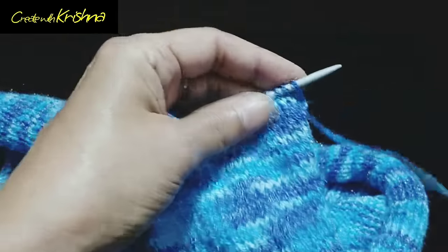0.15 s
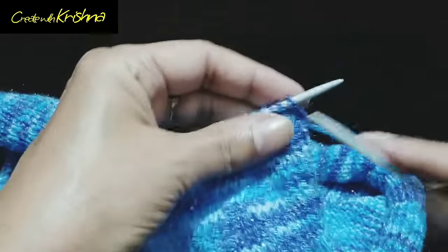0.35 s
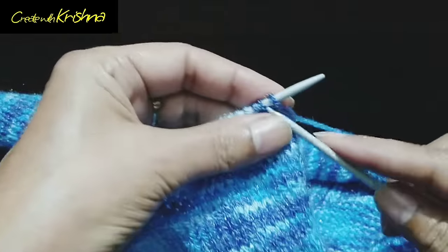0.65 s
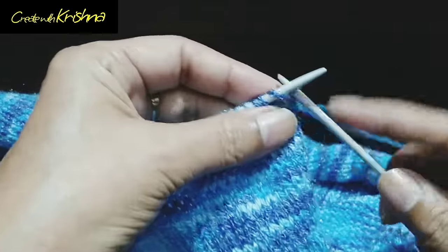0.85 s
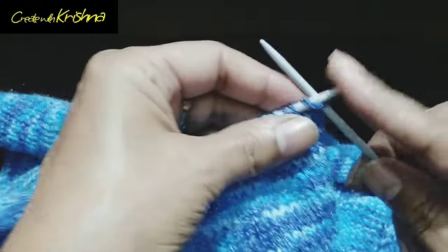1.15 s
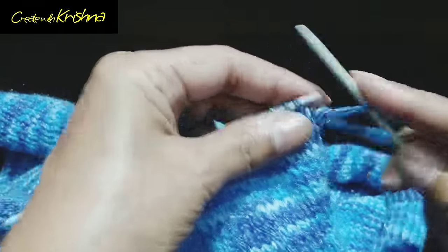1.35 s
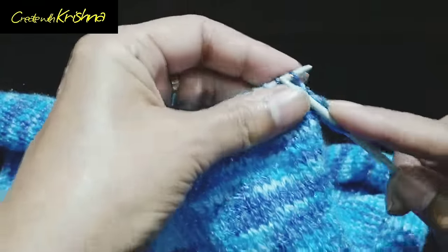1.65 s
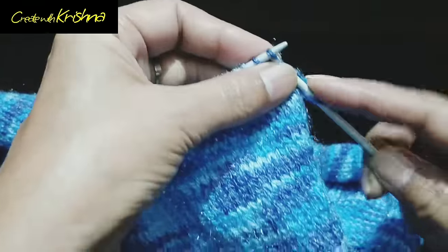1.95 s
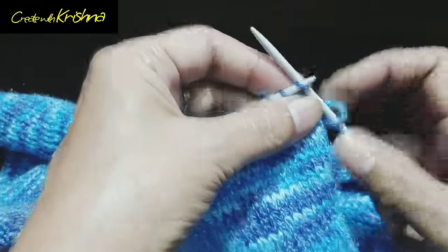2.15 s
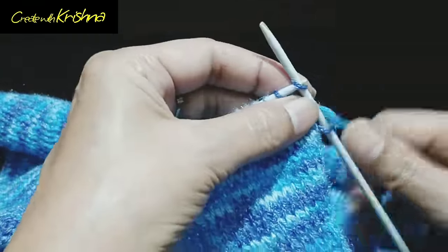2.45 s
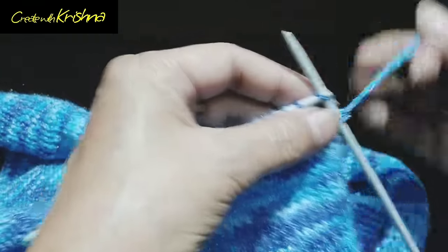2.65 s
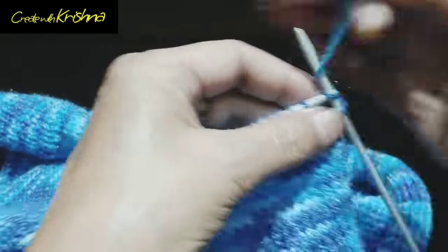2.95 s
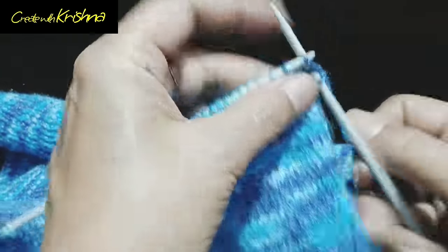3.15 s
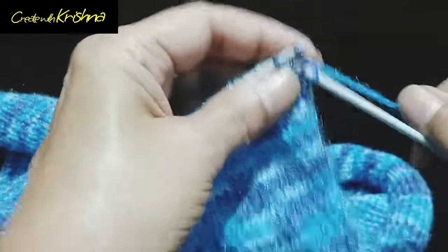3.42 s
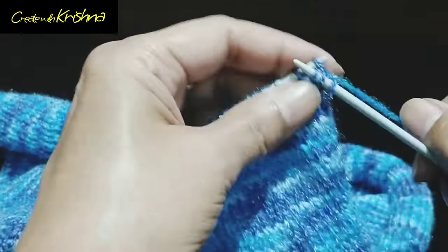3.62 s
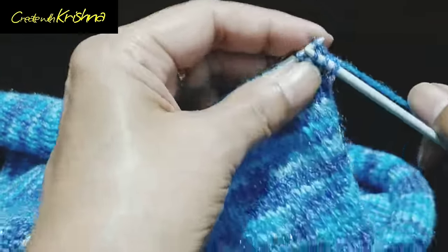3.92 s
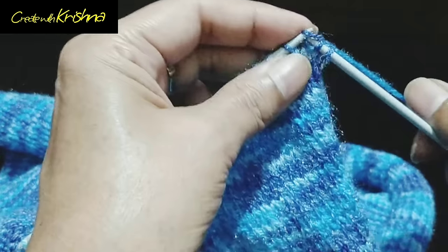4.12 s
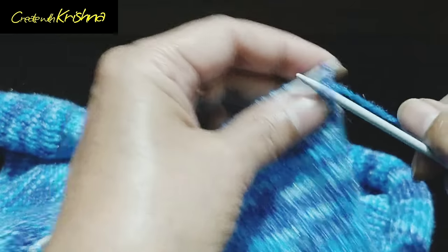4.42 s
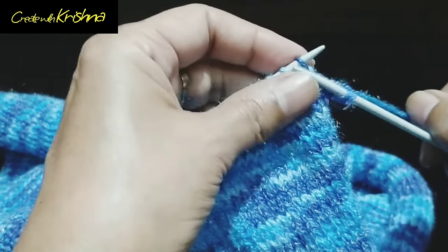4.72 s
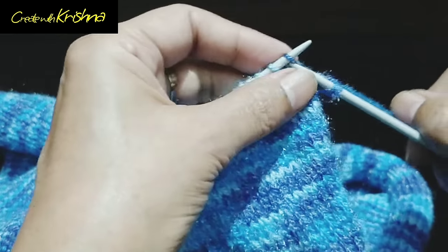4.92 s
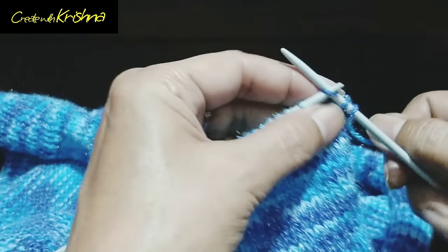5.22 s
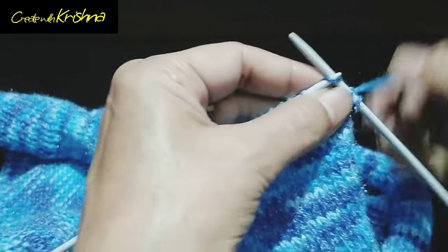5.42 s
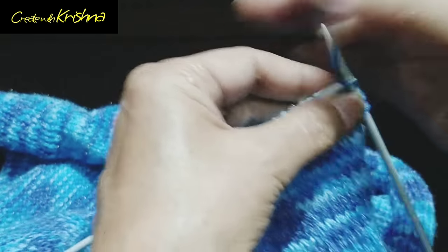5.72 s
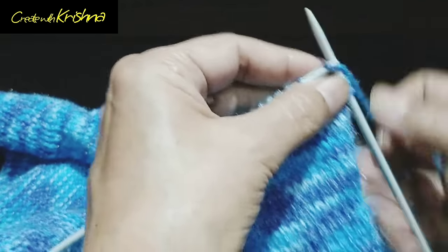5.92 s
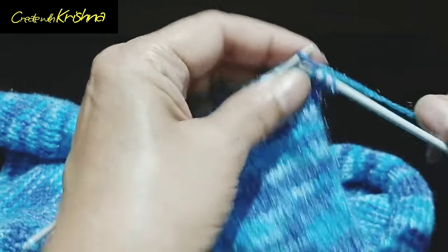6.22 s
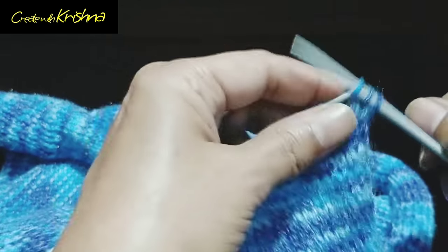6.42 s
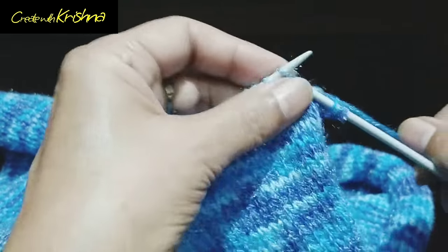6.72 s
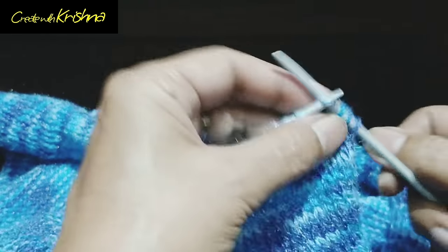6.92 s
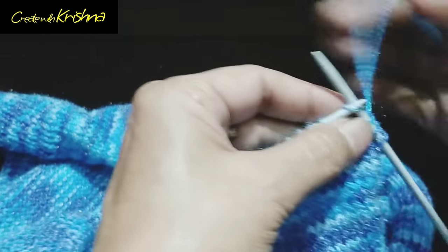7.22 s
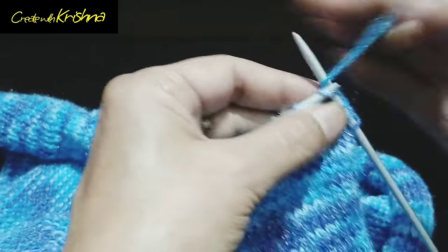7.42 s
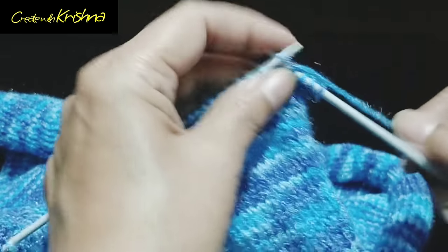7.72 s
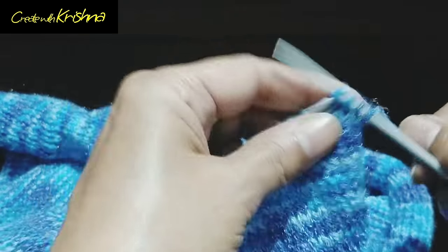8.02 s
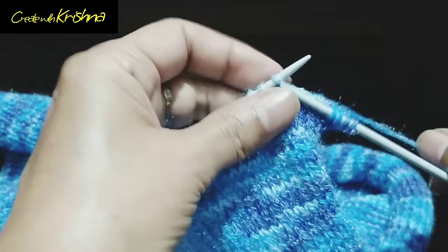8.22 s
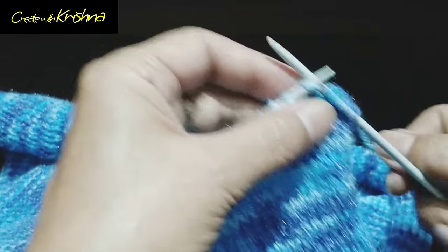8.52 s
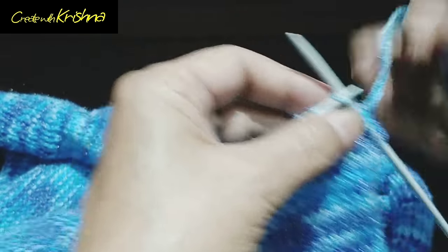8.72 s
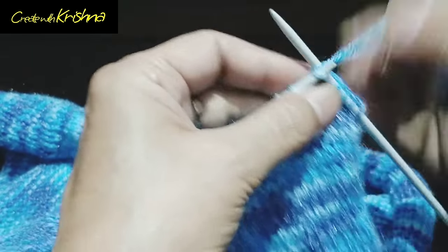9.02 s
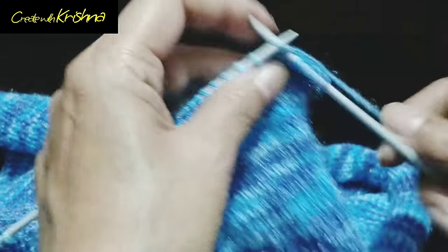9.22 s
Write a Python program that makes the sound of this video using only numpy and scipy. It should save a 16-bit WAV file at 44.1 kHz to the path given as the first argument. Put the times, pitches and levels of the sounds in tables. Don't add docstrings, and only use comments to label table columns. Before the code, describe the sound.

Faint, irregular knitting: tiny shrill clicks, metal gliding on metal, yarn brushing softly. One much louder hard crack with a quick double bounce and short high ring stands out early, followed by light taps and a thin scrape. Needle ticks then resume, busiest past the seven-second mark. It is close and dry, with glassy treble leaning left, in a small quiet room with steady low hum, distant rumble and microphone hiss.

```python
import sys
import numpy as np
from scipy import signal
from scipy.fft import rfft, irfft, next_fast_len
from scipy.io import wavfile
from scipy.ndimage import uniform_filter1d, minimum_filter1d, map_coordinates

SR = 44100
rng = np.random.default_rng(int(sys.argv[2]) if len(sys.argv) > 2 else 0)


def makeup_ratio(level_db):
    decades = np.asarray(level_db, float) / 20
    return 10 ** decades


def dump_mix(stems):
    frames = np.atleast_2d(stems).T
    limited = np.clip(frames, -1, 1)
    pcm = np.round(limited * 32767).astype(np.int16)
    wavfile.write(sys.argv[1], SR, pcm)


N = 412776
TIME = np.arange(N) / SR

# pitch in Hz, level in dB, left over right in dB.
HUM_LINES = [(99.7, -64.5, 1), (145.5, -64, 4), (239.4, -79.5, 0), (612, -92.5, 9.5)]
# pitch in Hz, width in Hz, lift in dB.
ROOM_MODES = [(94.7, 4, 22), (242.8, 3.3, 15), (269.3, 7, 12), (498, 130, 0), (600.5, 9.7, 19.5),
              (722.3, 23.7, 10), (1217, 54, 7)]
# frequency in Hz, level in dB.
AIR_COLOUR = [(50, -27.5), (80, -3), (130, -6), (200, 3.5), (300, -0.5), (550, -4.5), (680, -11.5),
              (900, -12.5), (1500, -26), (2500, -47.5)]
# time in seconds, level in dB.
RUMBLE_LEVEL = [(0.0, -63), (0.52, -59), (1.12, -67), (1.51, -64), (3.28, -70), (3.91, -73.5), (4.3, -66.5),
                (5.13, -67.5), (6.91, -69), (7.56, -62), (8.26, -71), (9.36, -65.5)]
# frequency in Hz, level in dB.
RUMBLE_COLOUR = [(8, -9), (25, -2), (42, -3), (60, 1.5), (80, -10.5), (100, -48.5)]
# frequency in Hz, level in dB.
HISS_COLOUR = [(590, -29), (1000, -4.5), (1860, -7), (2340, -5.5), (3500, -8), (5800, -9.5), (7740, -14),
               (9190, -17.5), (11200, -10.5), (13000, -9), (15600, -9.5)]
# frequency in Hz, likeness from -1 to 1.
SIDE_LIKENESS = [(60, 0.8), (180, 0.8), (550, 0.33), (1650, -0.02), (4970, -0.01), (15000, -0.1)]
# fastest moment in seconds, level in dB, rise in ms, fall in ms.
SLIDES = [(0.715, -69, 36, 33), (1.815, -62.5, 26, 30), (2.088, -52, 106, 155), (2.827, -66.5, 130, 17),
          (2.918, -70, 390, 340), (3.091, -60.5, 74, 180), (3.302, -64, 130, 59), (4.029, -68.5, 66, 12),
          (4.581, -60, 100, 18), (5.156, -51.5, 100, 66), (5.3, -70, 224, 185), (6.084, -63.5, 140, 290),
          (6.155, -57.5, 53, 18), (6.863, -54, 26, 90), (6.902, -46, 79, 68), (7.058, -68, 390, 59),
          (7.694, -51.5, 24, 22), (7.682, -50.5, 8, 40), (8.46, -61.5, 90, 80), (8.499, -50, 45, 104),
          (8.54, -52.5, 60, 69), (9.143, -66, 260, 10), (9.186, -55, 50, 26), (9.216, -53, 60, 55),
          (9.248, -51, 22, 24), (9.32, -67, 64, 160)]
# fastest moment in seconds, level in dB, rise in ms, fall in ms.
PULLS = [(0.201, -64.5, 73, 120), (0.807, -69, 76, 20), (0.951, -62, 10, 130), (1.17, -65.5, 52, 120),
         (1.23, -57.5, 124, 25), (1.6, -74, 66, 110), (3.552, -57.5, 76, 29), (4.6, -77, 100, 100),
         (5.12, -64, 90, 82), (5.657, -71.5, 280, 120), (5.949, -65.5, 51, 84), (7.603, -68, 150, 400),
         (8.6, -69, 33, 170)]
# time in seconds, level in dB.
BRUSHES = [(1.3, -81), (1.4, -80), (2.21, -74), (2.3, -76), (2.67, -70.5), (3.4, -74), (3.61, -75),
           (4.25, -85.5), (4.44, -76), (4.72, -76), (4.9, -72.5), (5.07, -68.5), (5.46, -72.5), (6.22, -73),
           (6.4, -68), (6.71, -72), (6.97, -79), (7.22, -68), (7.32, -72.5), (7.41, -82.5), (7.606, -62),
           (7.98, -72), (8.1, -75), (8.625, -64), (8.76, -73), (8.87, -71.5), (9.06, -74.5)]
SQUEAL_HZ = [10170, 10650, 11900, 12780, 13300, 14000, 14500, 15200]
RUB_HZ = [4720, 5500, 6285, 7340, 8400, 9560]
# frequency in Hz, level in dB.
SHRILL_COLOUR = [(7000, -44), (9000, -22.5), (10300, -16), (12300, -3.5), (14000, -2.5), (15500, -5),
                 (16600, -40), (17000, -80)]
# frequency in Hz, level in dB.
DULL_COLOUR = [(800, -25.5), (2000, -1), (4500, -1.5), (6500, -0.5), (8000, -3), (9500, -11.5),
               (12000, -73)]
# time in seconds, peak in dB, dull part below it in dB, pitch in Hz.
TICKS = [(0.5322, -42.5, -18, 15200), (0.602, -36.5, -21.5, 15300), (0.7703, -52, -14, 15100),
         (0.9348, -45.5, -15.5, 13600), (0.9577, -47, -20, 15400), (3.525, -50, -46.5, 12670),
         (4.1347, -38, -23.5, 14700), (4.5273, -34, -32, 14300), (4.5837, -52, -18, 15260),
         (4.7113, -56.5, -5.5, 15200), (4.7599, -33.5, -26.5, 13700), (5.0384, -30.5, -26, 14200),
         (5.1128, -48.5, -17, 12900), (6.0633, -42, -28, 11700), (6.112, -50, -26, 14900),
         (6.1459, -54, -18, 13300), (6.6024, -36.5, -21, 15100), (6.8588, -44.5, -29, 14500),
         (7.5973, -42, -22.5, 13900), (7.6256, -28, -32, 13400), (7.6777, -33, -41, 14200),
         (7.689, -31.5, -46, 12300), (7.7004, -41, -34, 11900), (7.7945, -29.5, -24.5, 12800),
         (8.35, -52, -13.5, 13300), (8.4884, -41, -41, 13550), (9.0593, -55.5, -15, 15200),
         (9.177, -43, -34, 14800), (9.2454, -44, -31, 15000), (9.3457, -46.5, -17, 12200)]
# pitch in Hz, level in dB.
DULL_MODES = [(2600, -8), (4500, 1), (6000, 5.5), (7500, 7)]
SINGING_HZ = [10400, 11890, 13540, 15200]
# time in seconds, level in dB.
RAP = [
    (2.476, 1.5),
    (2.4777, -2.5),
    (2.4802, -1),
]
# frequency in Hz, level in dB.
CRACK_COLOUR = [(60, -16), (200, 1), (450, -5), (800, -15), (1150, -14), (1600, 4.5), (2000, 1.5),
                (2800, -7.5), (4000, -9), (6000, 7.5), (8500, -1.5), (11000, 5), (14000, 2), (16500, -21)]
# pitch in Hz, level in dB, seconds to fall 60 dB.
NEEDLE_MODES = [(5475, -39.5, 0.21), (5620, -46, .15), (5766, -44, 0.23), (5879, -41.5, 0.21),
                (6160, -47.5, .2), (6780, -41.5, .1), (8280, -36, .12), (10330, -23.5, .076),
                (11400, -32.5, .1), (11890, -14, .055), (12790, -39, .1), (13538, -23, .1),
                (13600, -24, .1), (15200, -31.5, .13)]
# pitch in Hz, level in dB, seconds to fall 60 dB.
LOUDEST_NOTE = (13540, -5, .026)
# pitch in Hz, level in dB, seconds to fall 60 dB.
MOUNT_MODES = [(38, -37.5, .25), (73.06, -45.5, 0.11), (200, -42.5, 0.035), (915, -47.5, 0.048)]
# pitch in Hz, width in Hz, level in dB.
EDGE_MODES = [(472, 20, -4.5), (1305, 73, -4.5), (1607, 90, -5), (1925, 73, -9.5), (2475, 110, -4.5),
              (2804, 110, -1), (3150, 380, -6.5), (4170, 484, -13.5)]
# time in seconds, peak in dB.
TOUCHES = [
    (2.7707, -44),
    (2.7839, -43.5),
    (5.233, -59),
    (5.7604, -60),
    (5.7982, -59),
]
# pitch in Hz, width in Hz, level in dB.
TOUCH_MODES = [(1290, 650, -6.5), (2980, 440, 0), (6400, 710, -1.5), (7830, 210, 3.5), (12200, 1700, -4.5)]
# hardest moment in seconds, scrape level in dB, rise in ms, fall in ms, singing in dB.
DRAGS = [
    (2.8, -65, 20, 35, -10),
    (2.92, -66.5, 120, 340, -6),
    (3.105, -61, 291, 63, -1.5),
    (5.762, -65.5, 11, 63, -18.5),
    (5.925, -67, 110, 65, -5.5),
]
# frequency in Hz, left over right in dB.
PORT_LIFT = [(2000, -2.5), (5500, -1.5), (7000, 6), (8500, 11), (10500, 12), (12000, 16), (13500, 25.5),
             (15200, 14)]
# frequency in Hz, seconds to fall 60 dB.
ROOM_DECAY = [(300, 0.43), (1500, 0.12), (4000, 0.1587), (8000, 0.27), (14000, 0.23)]


def unit(x):
    return x / np.sqrt(np.mean(x ** 2) + 1e-20)


def along(points, hz):
    f, v = np.transpose(points)
    return np.interp(np.log(hz + 1), np.log(f + 1), v)


def filtered(x, response):
    n = x.shape[-1]
    m = next_fast_len(n + 8192)
    return irfft(rfft(x, m) * response(np.fft.rfftfreq(m, 1 / SR)), m)[..., :n]


def coloured(x, spectrum):
    return filtered(x, lambda hz: makeup_ratio(along(spectrum, hz)))


def resonances(modes):
    def response(f):
        total = 0
        for k, (c, width, db) in enumerate(modes):
            damping = 1j * f * width
            total = total + (-1) ** k * makeup_ratio(db) * damping / (c * c - f * f + damping)
        return total
    return response


def wobble(rate):
    return map_coordinates(rng.standard_normal(int(N * rate / SR) + 4), [TIME * rate])


def steady(x):
    return filtered(x, lambda hz: hz < 15580)


def swells(rows):
    s, db, rise, fall = np.transpose(rows)[:4, :, None]
    ms = (TIME[::32] - s) * 1000
    side_ms = np.where(ms < 0, rise, fall).clip(4)
    swell_db, rounded = 30, 1.3
    return makeup_ratio(db - swell_db * np.abs(ms / side_ms) ** rounded)


def smooth(gain):
    return np.interp(TIME, TIME[::32], np.sqrt((gain ** 2).sum(0)))


def ringing(t, modes, rough_db):
    total = 0
    for hz, db, t60 in modes:
        flutter = rough_db * map_coordinates(rng.standard_normal(80), [t * 120], mode="wrap")
        total = total + makeup_ratio(db - 60 * t / t60 + flutter) * np.sin(2 * np.pi * hz * t)
    return total


def place(out, s, sound):
    out[:, round(s * SR):][:, :sound.shape[-1]] += sound


def pair(response):
    def mid_side(hz):
        turn = np.arccos(np.clip(along(SIDE_LIKENESS, hz), -1, 1)) / 2
        return response(hz) * np.array([np.cos(turn), np.sin(turn)])
    mid, side = filtered(rng.standard_normal((2, N)), mid_side)
    return unit(np.array([mid + side, mid - side]))


def background():
    hum = 0
    for hz, db, pan_db in HUM_LINES:
        sides_db = np.array([[pan_db / 2], [-pan_db / 2]])
        gain = makeup_ratio(db + 0.53 * wobble(2.7) + sides_db)
        hum = hum + gain * np.sqrt(2) * np.sin(2 * np.pi * hz * TIME)

    def air_response(f):
        lift = 1 + sum(makeup_ratio(db) / (1 + (2 * (f - c) / w) ** 2) for c, w, db in ROOM_MODES)
        return makeup_ratio(along(AIR_COLOUR, f)) * lift
    air = makeup_ratio(-59.0 + 0.15 * wobble(3.1)) * pair(air_response)
    rumble_db = np.interp(TIME, *np.transpose(RUMBLE_LEVEL)) + 2.5 + 1.5 * wobble(4.6)
    rumble = makeup_ratio(rumble_db) * pair(lambda f: makeup_ratio(along(RUMBLE_COLOUR, f)))
    hiss = makeup_ratio([[-68], [-69]]) * pair(lambda f: makeup_ratio(along(HISS_COLOUR, f)))
    return hum + air + rumble + hiss


def slips():
    return rng.standard_normal(N) * makeup_ratio(3 * wobble(900) + 6 * wobble(30))


def slides():
    brushes = [(s, db, 100, 100) for s, db in BRUSHES]
    after = [(s + 0.0068, db - 39, 4, 83) for s, db, *_ in TICKS]
    shrill_gain = smooth(swells(SLIDES + PULLS + brushes + after))
    moving = shrill_gain / (shrill_gain + makeup_ratio(-88.5))
    dull_gain = makeup_ratio(-72.5) * (shrill_gain / makeup_ratio(-55)) ** 0.59 * moving
    pull_share = (smooth(swells(PULLS)) / (shrill_gain + makeup_ratio(-85))) ** .5
    dull_gain *= makeup_ratio(6 * pull_share)

    clumps = makeup_ratio(2.5 * wobble(300))
    squeals = sum(filtered(slips(), resonances([(hz, 220, along(SHRILL_COLOUR, hz))])) for hz in SQUEAL_HZ)
    squeals = unit(coloured(squeals, [(8500, -30), (10000, 0)]))
    rustle = unit(coloured(rng.standard_normal((2, N)), SHRILL_COLOUR))
    shrill = unit(steady(clumps * (squeals + .5 * rustle)))
    rub = unit(sum(filtered(slips(), resonances([(hz, 250, 0)])) for hz in RUB_HZ))
    dull_rustle = unit(coloured(rng.standard_normal((2, N)), DULL_COLOUR))
    dull = unit(steady(clumps * (dull_rustle + 0.8 * rub)))
    return makeup_ratio([[5], [-14]]) * shrill_gain * shrill + makeup_ratio(2.5) * dull_gain * dull


def to_peak(x):
    return x / np.abs(x).max(1)[:, None]


def ticks():
    out, t = np.zeros((2, N + SR)), np.arange(SR // 8) / SR

    def peak(f, centre_hz, width_hz):
        return .45 + 1 / (1 + ((f - centre_hz) / width_hz) ** 2)
    for s, db, dull_db, hz in TICKS:
        pan_db = 38 - 0.73 * db
        struck = makeup_ratio(7 * rng.normal(size=4))
        burst = rng.standard_normal((2, len(t))) * (t / .0005) * np.exp(-t / 0.00092)

        def dull_response(f):
            modes = sum(g * makeup_ratio(mode_db) * peak(f, c, 520) ** 2 for g, (c, mode_db) in zip(struck, DULL_MODES))
            return makeup_ratio(along(DULL_COLOUR, f)) * modes
        shrill = to_peak(filtered(burst, lambda f: makeup_ratio(along(SHRILL_COLOUR, f)) * peak(f, hz, 630)))
        shrill += makeup_ratio(-33) * ringing(t, [(c, rng.normal(0, 5), .07) for c in SINGING_HZ], rough_db=3)
        dull = to_peak(filtered(burst, dull_response))
        place(out, s, makeup_ratio(db + 6) * makeup_ratio([[0], [-pan_db]]) * shrill + makeup_ratio(db + dull_db + 11.5) * dull)
    return out[:, :N]


def rap():
    out, push, t = np.zeros((2, N + SR)), np.zeros(N), np.arange(SR // 2) / SR
    for s, db in RAP:
        crack = coloured(makeup_ratio(-60 * t / 0.012) * rng.standard_normal((2, len(t))), CRACK_COLOUR)
        place(out, s, makeup_ratio(db - 15.5) * crack)
        push[round(s * SR)] = makeup_ratio(db + 3.0)
    blow_s = RAP[0][0]
    note_hz, note_db, note_t60 = LOUDEST_NOTE
    note = makeup_ratio(note_db - 60 * (t / note_t60) ** 3) * np.sin(2 * np.pi * note_hz * t)
    needle = (1 - np.exp(-t / .0008)) * (note + ringing(t, NEEDLE_MODES, rough_db=3))
    place(out, blow_s, needle + ringing(t, MOUNT_MODES, rough_db=1))
    rattle_modes = [(5693, 450, -0.5), (2880, 150, -6), (10730, 1500, -4.5)]  # Hz, width Hz, dB
    rattle = unit(filtered(rng.standard_normal((2, len(t))), resonances(rattle_modes)))
    place(out, blow_s, makeup_ratio(-45.5 - 60 * t / 0.39) * steady(rattle))
    return out[:, :N] + filtered(push, resonances(EDGE_MODES))


def touches():
    out, push, t = np.zeros((2, N + SR)), np.zeros(N), np.arange(SR // 2) / SR
    for s, db in TOUCHES:
        tap = makeup_ratio(-60 * t / 0.038) * rng.standard_normal((2, len(t)))
        place(out, s, makeup_ratio(db + 5.0) * steady(filtered(tap, resonances(TOUCH_MODES))))
        push[round(s * SR)] = makeup_ratio(db + 10)
    return out[:, :N] + filtered(push, resonances(EDGE_MODES))


def drags():
    gain = swells(DRAGS)
    scrape_gain = smooth(gain)
    sing_gain = smooth(gain * makeup_ratio(np.transpose(DRAGS)[4, :, None]))
    rub = rng.standard_normal((2, N)) * makeup_ratio(1.5 * wobble(50) + 3 * wobble(600))
    scrape = makeup_ratio(0.5) * scrape_gain * unit(filtered(rub, resonances(EDGE_MODES)))
    low_modes = [(5400, 140, -7), (6140, 370, -11.5), (7550, 160, -5.5)]  # Hz, width Hz, dB
    sing_modes = low_modes + [(hz, 60, 0) for hz in SINGING_HZ[1:]]
    sing = makeup_ratio(4.0) * sing_gain * unit(filtered(rub[0], resonances(sing_modes)))
    return steady(scrape + sing)


def ports(x):
    return filtered(x, lambda hz: np.array([hz ** 0, makeup_ratio(-along(PORT_LIFT, hz))]))


def room(x):
    hz, t, z = signal.stft(rng.standard_normal((2, SR // 2)), SR, nperseg=256)
    tail = signal.istft(z * makeup_ratio(-60 * t / along(ROOM_DECAY, hz)[:, None]), SR, nperseg=256)[1]
    delayed = np.pad(x, (250, 0))[None]
    return signal.fftconvolve(delayed, tail / np.linalg.norm(tail[0]), axes=1)[:, :N]


def thinned(x):
    hz, _, z = signal.stft(x, SR, nperseg=2048)
    power = uniform_filter1d((np.abs(z) ** 2).mean(0), size=10, axis=0)
    level_db = 10 * np.log10(np.abs(power) + 1e-20)
    treble_db = level_db[(hz > 11000) & (hz < 15000)].mean(0)
    quiet_db = np.percentile(treble_db, 20)
    luck = uniform_filter1d(rng.standard_normal(level_db.shape), size=5, axis=0)
    luck = unit(uniform_filter1d(luck, size=3, axis=1))
    limit_db = quiet_db - 10 + .45 * (treble_db - quiet_db) + 5.5 * luck
    keep = (level_db > limit_db) | (hz[:, None] < 1800) | (hz[:, None] > 11500)
    keep = minimum_filter1d(keep * 1., size=2, axis=1)
    keep = np.maximum(keep, level_db > quiet_db + 6)
    return signal.istft(z * keep, SR, nperseg=2048)[1][:, :N]


def scene():
    behind = background()
    near = slides() + ticks() + ports(rap() + touches() + drags())
    return near + steady(makeup_ratio(-13.5) * room(near[1]) + behind)


def band_limit(x):
    return signal.sosfilt(signal.butter(12, 16790, fs=SR, output="sos"), x)


def record(dry):
    mix = filtered(thinned(dry), lambda hz: np.clip((16850 - hz) / 400, 0, 1))
    return band_limit(mix)


dry = scene()
out = record(dry)
dump_mix(out)
```